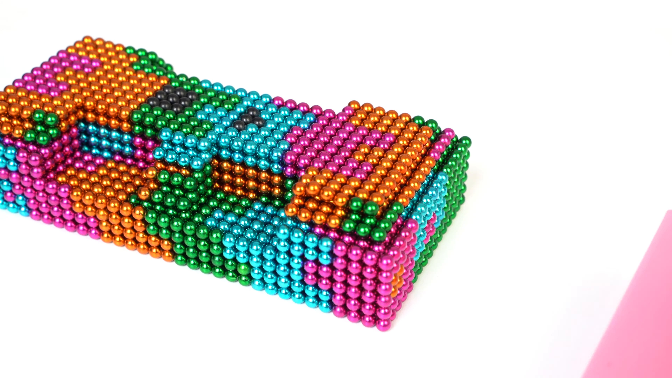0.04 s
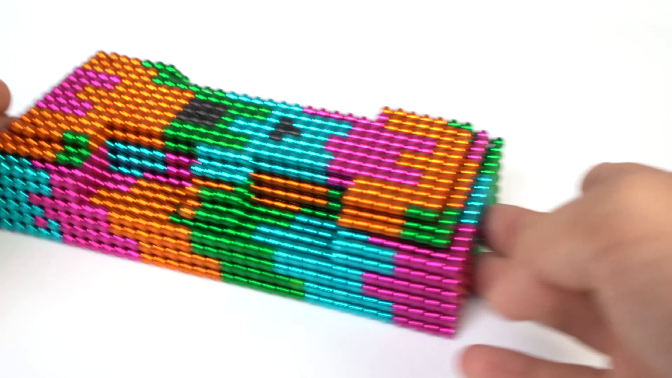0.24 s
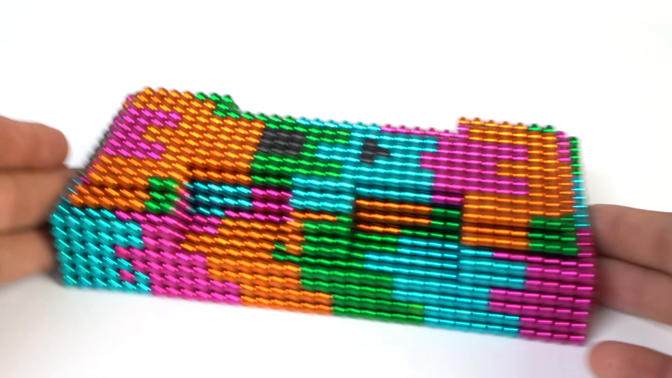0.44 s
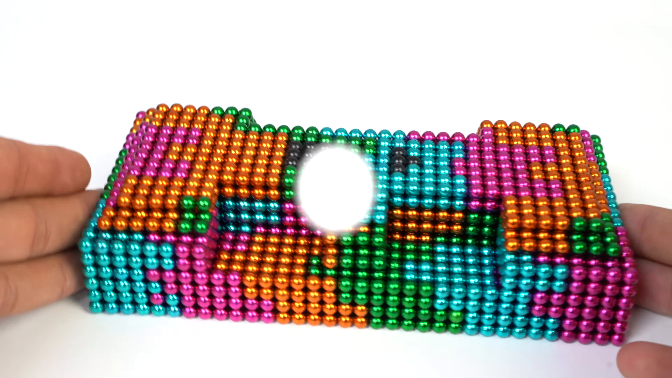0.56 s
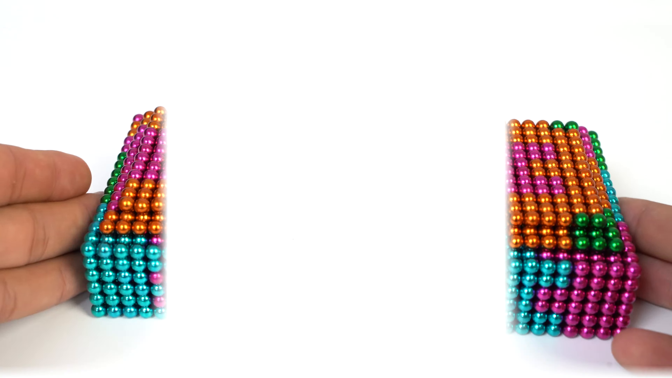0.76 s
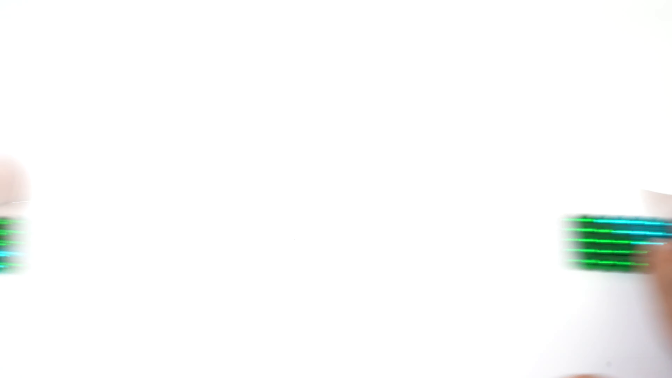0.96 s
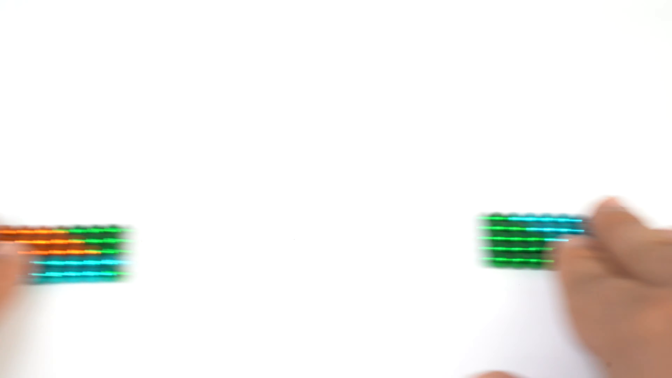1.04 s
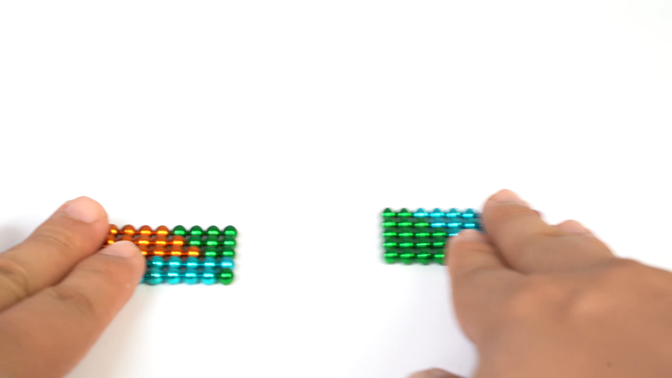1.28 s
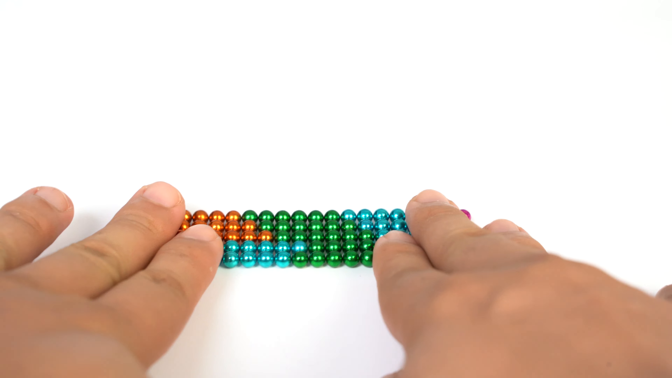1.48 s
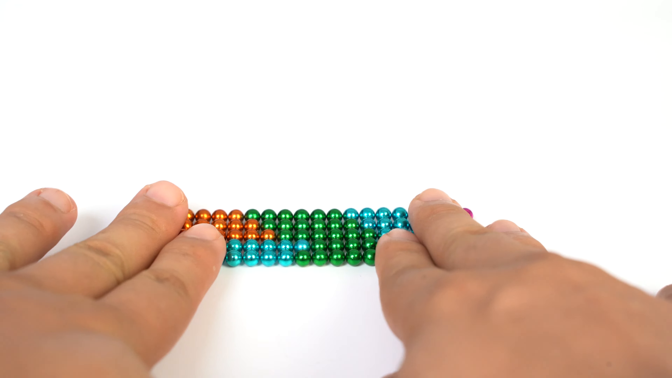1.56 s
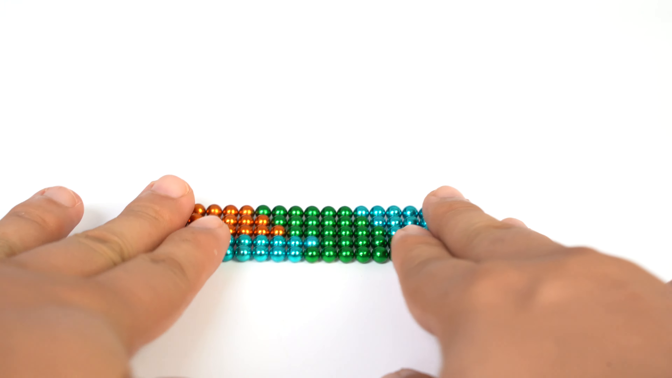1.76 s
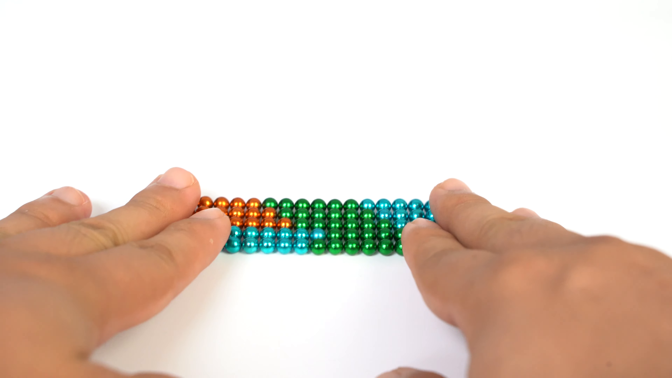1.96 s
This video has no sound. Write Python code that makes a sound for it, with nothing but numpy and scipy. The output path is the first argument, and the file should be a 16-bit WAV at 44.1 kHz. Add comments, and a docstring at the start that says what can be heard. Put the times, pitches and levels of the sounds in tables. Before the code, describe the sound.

Magnetic balls dragged on a tabletop, followed by two strips sliding and clicking sharply shut.

```python
"""A table top in a small room. A heavy block of small magnetic balls is dragged round, then two light strips of
them slide together; the sound of each slide sets in and breaks off abruptly. Countless tiny contacts ring the
table. The strips snap shut row by row like a zip, the room rings, and fingers settle the joined strip. Quiet
room noise lies underneath, joined by a faint hum after the slides."""
import sys
import numpy as np
from scipy import signal
from scipy.fft import rfft, irfft
from scipy.io import wavfile
from scipy.ndimage import uniform_filter1d

SR = 44100
rng = np.random.default_rng(int(sys.argv[2]) if len(sys.argv) > 2 else 0)


def unload_wav(signal):
    """Save mono or channel-first audio to the path in sys.argv[1] as 16-bit WAV at rate SR, clipped to [-1, 1]."""
    wavfile.write(
        sys.argv[1],
        SR,
        np.round(np.clip(np.atleast_2d(signal).T, -1, 1) * 32767).astype(np.int16),
    )


N = 90405
T, HZ = np.arange(N) / SR, np.arange(N + 1) * SR / (2 * N)
BLOCK_SPAN_S, STRIP_SPAN_S = (.149, .829), (.829, 1.432)


def amp(db):
    """Decibels to gain."""
    return 10 ** (np.asarray(db) / 20)


def unit(x):
    """Scale to rms 1."""
    return x / np.sqrt(np.mean(x ** 2))


def over_hz(points, hz):
    """Interpolate (Hz, value) points over log frequency."""
    freqs, values = np.array(points).T
    return np.interp(np.log(np.maximum(hz, 1)), np.log(freqs), values)


def wander(rate_hz):
    """Smooth random drift, rms 1."""
    width = max(int(SR / rate_hz), 2)
    drift = uniform_filter1d(rng.standard_normal(N), width, mode="wrap")
    return unit(uniform_filter1d(drift, width, mode="wrap"))


def body(x, colour, modes=()):
    """Minimum-phase filter: broad colour plus resonances."""
    lift_db = sum(db / (1 + (2 * (HZ - hz) / width_hz) ** 2) for hz, width_hz, db in modes)
    cepstrum = irfft(np.log(amp(over_hz(colour, HZ) + lift_db)))
    cepstrum[1:N] *= 2
    cepstrum[N + 1:] = 0
    return irfft(rfft(x, 2 * N) * np.exp(rfft(cepstrum)))[:N]


def split(x, hz, order=12):
    """Parts below and above a crossover."""
    low = irfft(rfft(x, 2 * N) / (1 + (HZ / hz) ** order))[:N]
    return low, x - low


def bands(x, points):
    """Yield (band, value): overlapping bands centred on (Hz, value) points."""
    spectrum = rfft(x, 2 * N)
    for centre_hz, value in points:
        weight = over_hz([(hz, float(hz == centre_hz)) for hz, _ in points], HZ)
        yield irfft(spectrum * weight)[:N], value


def during(span_s):
    """Gate with abrupt edges."""
    return uniform_filter1d(((T >= span_s[0]) & (T < span_s[1])) * 1., size=40)


def fade(start_s, t60_s, rise_s):
    """Quick rise, exponential decay."""
    age_s = np.maximum(T - start_s, 0)
    return (1 - np.exp(-age_s / rise_s)) * np.exp(-np.log(1000) * age_s / t60_s)


def ring(start_s, modes, rise_s):
    """Decaying modes struck together."""
    return sum(amp(db) * fade(start_s, t60_s, rise_s) * np.sin(2 * np.pi * hz * (T - start_s))
               for hz, db, t60_s in modes)


def contacts(scatter_db, judder_db, judder_hz, per_s=9000):
    """Dense tiny impacts; stick-slip judder varies their strength."""
    hits = (rng.random(N) < per_s / SR) * np.sign(rng.standard_normal(N))
    return hits * amp(scatter_db * rng.standard_normal(N) + judder_db * wander(judder_hz))


def driven(x, level_db, growth):
    """Each band follows the level at its own slope: louder is brighter."""
    top_db = level_db.max()
    return sum(band * amp(top_db + slope * (level_db - top_db)) for band, slope in bands(x, growth))


# Room noise spectrum (frequency [Hz], gain [dB])
NOISE_COLOUR = [(30,-4),(80,-2),(160,-6),(700,-1),(1400,-8),(2800,-6.5),(4500,-20),(9000,-12.5),(15500,-13)]
# Hum tones (frequency [Hz], level [dB])
HUM_TONES = [(75,-71),(225,-67.5),(705,-58),(780,-58),(850,-68.5),(1330,-67.5),(1385,-71.5)]


def background():
    """Quiet room noise; a wavering hum enters as the strips stop sliding."""
    hum = 0
    for hz, db in HUM_TONES:
        peak = np.sqrt(2) * amp(db + 3.3 * wander(30))
        phase = 2 * np.pi * np.cumsum(hz + 12 * wander(70.6)) / SR
        hum += peak * np.sin(phase)
    noise = amp(-67) * unit(body(rng.standard_normal(N), NOISE_COLOUR))
    return noise + hum * during((STRIP_SPAN_S[1], np.inf))


def bump(hz=73, db=-46, t60_s=.5):
    """Vanishing tail of a hand bumping the table before the start."""
    return ring(-.7, [(hz, db, t60_s)], rise_s=.008)


# Rubs (peak time [s], level [dB], rise [s], fall [s], resonance [Hz])
FINGER_RUBS = [(.008,-46.5,0.022,0.036,910),(0.057,-53,0.0092,0.015,970),(.1,-58,0.033,.04,895),(1.531,-28,0.011,0.007,773),(1.813,-39.5,0.03,0.026,793)]
# Rub spectrum (frequency [Hz], gain [dB])
FINGER_COLOUR = [(60,-34),(150,-36.5),(330,-15.5),(500,-15.5),(800,-1),(1050,-13.5),(1330,-1),(1700,-17.5),(2700,-18),(4500,-28.5),(15000,-32)]


def rubs(width_hz=80, lift_db=15):
    """Fingers nudge the balls: short soft scrapes ring the table."""
    out = 0
    for peak_s, db, rise_s, fall_s, hz in FINGER_RUBS:
        swell = np.exp(-np.maximum((peak_s - T) / rise_s, (T - peak_s) / fall_s))
        impacts = contacts(scatter_db=1.5, judder_db=-2.5, judder_hz=200)
        out += amp(db) * swell * unit(body(impacts, FINGER_COLOUR, [(hz, width_hz, lift_db)]))
    return out


# Loose ball modes (frequency [Hz], level [dB], t60 [s])
LOOSE_BALL_MODES = [(1763,-42,.13),(2090,-45,0.095),(2390,-46,0.12),(2730,-43.5,0.13),(4070,-42.5,0.19),(5030,-49,0.084),(5970,-52,0.089),(6820,-53.5,0.081)]


def grip(start_s=.162):
    """Loose balls ring unevenly as the block is gripped."""
    return sum(ring(start_s, [mode], rise_s=.0036) * (.87 + .78 * wander(144))
               for mode in LOOSE_BALL_MODES)


# Block drag (time [s], scrape level [dB], rumble level [dB])
DRAG_LEVELS = [(.15,-54,-41.5),(.165,-47,-44),(.2,-42,-30),(0.22,-28,-24.5),(0.272,-20,-8.5),(0.339,-20,-18.5),(.37,-14,-12.5),(.45,-15,-13),(.49,-13.5,-16),(.545,-14,-15),(.59,-20,-14.5),(.645,-28.5,-18),(.668,-35.5,-23),(.75,-49,-34),(.828,-57.5,-39)]
# Drag spectrum (frequency [Hz], gain [dB])
DRAG_COLOUR = [(40,-70.5),(80,-34),(140,-18.5),(190,-1.5),(290,2),(385,-10),(480,-2),(630,-4.5),(1000,-16),(1700,-21.5),(2700,-28),(4500,-36),(7000,-44.5),(15500,-48)]
# Table modes under the block (frequency [Hz], width [Hz], lift [dB]); negative: dead spot
DRAG_MODES = [(114.8,8,14.5),(223.2,12,10.5),(312.2,16,7),(514,14,3),(677.6,13,5.5),(810,8.3,6.5),(1288,97,10.5),(1450,154,-15.5),(2600,160,5),(3180,160,0),(3580,254,-28)]
# Band growth with scrape level (frequency [Hz], slope [dB/dB])
DRAG_GROWTH = [(500,1.0),(1500,1.1),(4000,1.37),(12000,1.06)]


def block():
    """The heavy block judders over the table: rumble and dull scrape."""
    times_s, scrape_db, rumble_db = np.array(DRAG_LEVELS).T
    impacts = contacts(scatter_db=2, judder_db=.5, judder_hz=218)
    low, high = split(body(impacts, DRAG_COLOUR, DRAG_MODES), hz=381)
    rumble = unit(low) * amp(np.interp(T, times_s, rumble_db))
    scrape = driven(unit(high), np.interp(T, times_s, scrape_db), DRAG_GROWTH)
    return during(BLOCK_SPAN_S) * (amp(-.14) * rumble + amp(-.5) * scrape)


# Strip slide (time [s], scrape level [dB], hiss level [dB])
SLIDE_LEVELS = [(0.83, -58.5, -95), (0.862, -45.5, -91), (0.882, -39, -87), (0.888, -36, -78),
                (0.91, -28, -61), (0.978, -17, -39), (1.022, -14, -31), (1.07, -14.5, -26.5),
                (1.138, -15.5, -32.5), (1.242, -25, -48.5), (1.254, -27, -51.5), (1.294, -35.5, -61.5),
                (1.418, -30, -50.5), (1.43, -36, -56.5)]
# Slide spectrum (frequency [Hz], gain [dB])
SLIDE_COLOUR = [(30,-60),(125,-33.5),(165,-38.5),(215,-16),(350,-14),(560,-0.5),(900,-2),(1400,-2.5),(2100,-3.5),(2900,-7),(3500,-11.5),(4500,-13.5),(6500,-24),(15500,-28)]
# Table modes under the strips (frequency [Hz], width [Hz], lift [dB])
SLIDE_MODES = [(317.7,16,7),(434.5,18,12),(802,18,12),(841,19,9.6),(882,12,8),(1152,22,6.3),(1300,22,6.5),(1341.3,44,12),(1499,16,6),(1653,14,9.5),(1743,20,7.4),(1975,30,8),(2338,16,6),(2680,170,3)]
# Band growth with scrape level (frequency [Hz], slope [dB/dB])
SLIDE_GROWTH = [(120,0.21),(300,0.91),(900,0.93),(2000,1.2),(4500,1.47)]


def strips():
    """The light strips skate over the table, hissing when fastest."""
    times_s, scrape_db, hiss_db = np.array(SLIDE_LEVELS).T
    impacts = contacts(scatter_db=1.5, judder_db=-.02, judder_hz=302)
    low, high = split(body(impacts, SLIDE_COLOUR, SLIDE_MODES), hz=5470)
    scrape = driven(unit(low), np.interp(T, times_s, scrape_db), SLIDE_GROWTH)
    hiss = unit(high) * amp(np.interp(T, times_s, hiss_db))
    return during(STRIP_SPAN_S) * (amp(1.05) * scrape + amp(1.64) * hiss)


# Reverb spectrum (frequency [Hz], gain [dB])
REVERB_COLOUR = [(60,-22.5),(140,-26.5),(220,-13.5),(400,-10),(490,-24.5),(680,2.5),(1000,-4),(1400,-3),(2600,-3),(4000,-9),(7000,-11.5),(9000,-9.5),(12500,-11.5),(15500,-10.5)]
# Reverb decay (frequency [Hz], t60 [s])
REVERB_T60 = [(200,0.64),(700,0.42),(2000,0.41),(6000,0.37),(14000,.3)]


def room(start_s):
    """Dense echoes of the snap; the lows last longest."""
    echoes = unit(body(rng.standard_normal(N), REVERB_COLOUR, modes=[(9000, 200, 6.01)]))
    return sum(band * fade(start_s, t60_s, rise_s=.003) for band, t60_s in bands(echoes, REVERB_T60))


# Rows of balls meeting (time [s], level [dB], ring [Hz])
ROW_CLICKS = [(1.5340,3.5,10750),(1.5348,-6.5,11300),(1.53545,-2.5,10600),(1.5363,2.5,11830),(1.5371,-2.5,13100),(1.5382,-10.5,12800),(1.5389,-9.5,12000),(1.5400,-12.5,12500)]
# Table modes rung by the snap (frequency [Hz], level [dB], t60 [s])
SNAP_TABLE_MODES = [(75,-58,.4),(220,-45.5,.7),(398,-33.5,0.34),(691.5,-28,0.31),(815,-27.5,.25),(1342,-28.5,.3),(1480,-45,.25)]


def snap(rise_s=.00007, t60_s=.002):
    """Row after row clicks shut; the table rings and the room answers."""
    knock = (2760, -13, .0037)  # Hz, dB, t60 s
    clicks = sum(amp(db) * ring(at_s, [(hz, 5, t60_s), knock], rise_s) for at_s, db, hz in ROW_CLICKS)
    bursts = sum(amp(db) * fade(at_s, t60_s, rise_s) for at_s, db, _ in ROW_CLICKS)
    crack = amp(-4) * bursts * rng.standard_normal(N)
    _, direct = split(clicks + crack, hz=1300, order=4)
    start_s = ROW_CLICKS[0][0]
    return direct + amp(-23.5) * room(start_s) + ring(start_s, SNAP_TABLE_MODES, rise_s=.008)


def scene():
    """All moves, close up, in mono."""
    handling = grip() + bump() + rubs()
    return (handling + block() + strips() + snap() + background())[None]


def record(dry, cutoff_hz=15950):
    """Clip the loudest peaks, then low-pass."""
    lowpass = signal.ellip(10, .1, 80, cutoff_hz, fs=SR, output="sos")
    return signal.sosfilt(lowpass, np.clip(dry, -1, 1))


dry = scene()
out = record(dry)
unload_wav(out)
```